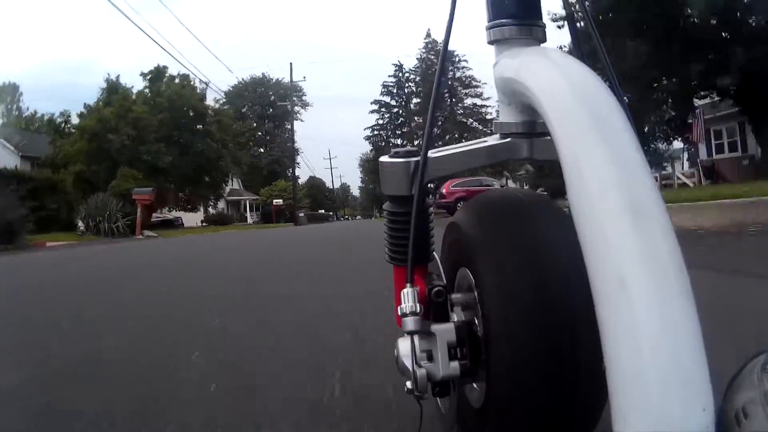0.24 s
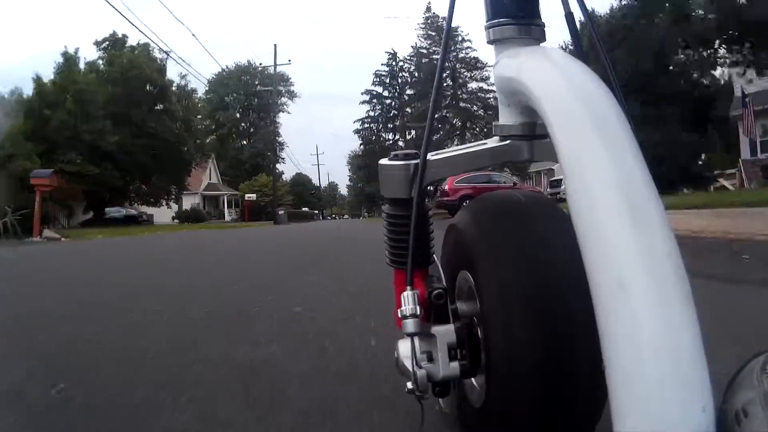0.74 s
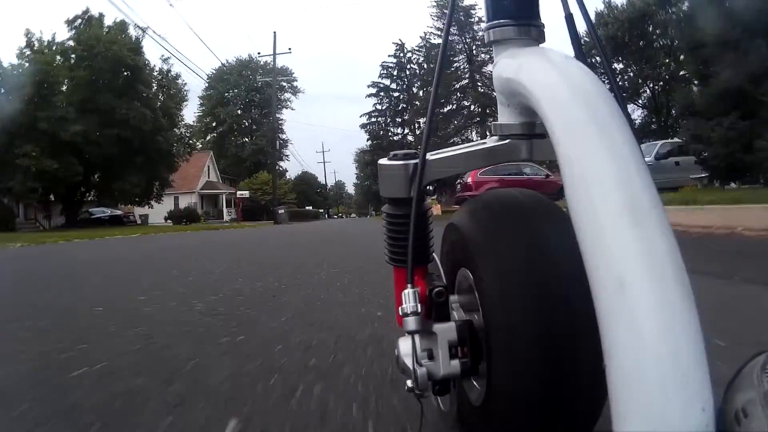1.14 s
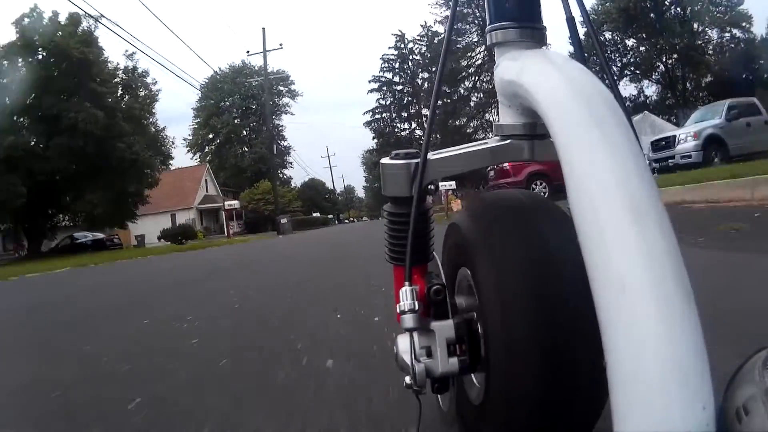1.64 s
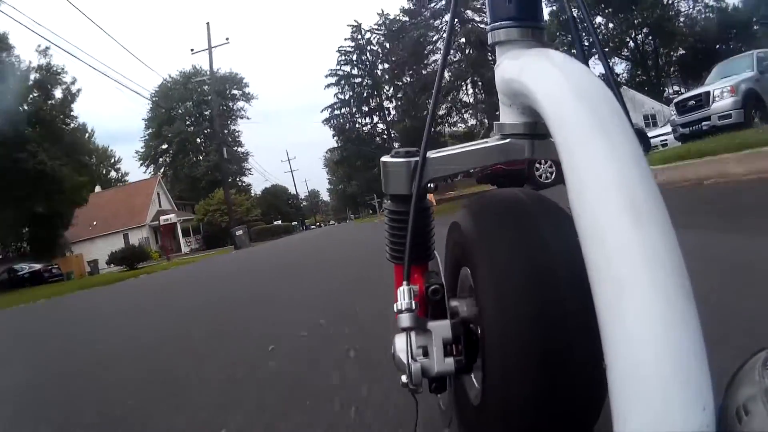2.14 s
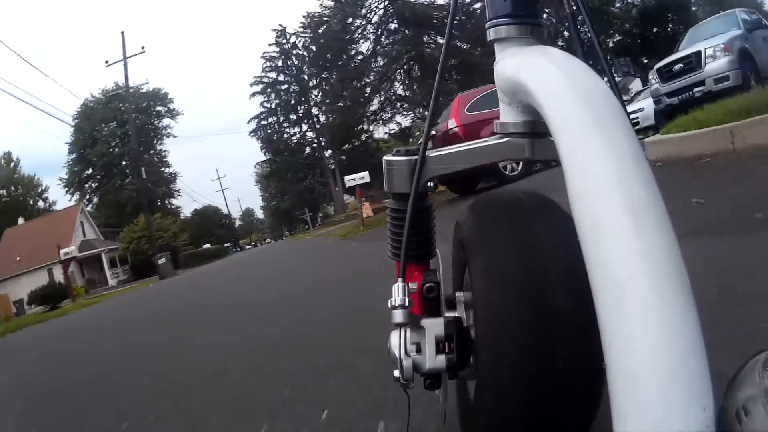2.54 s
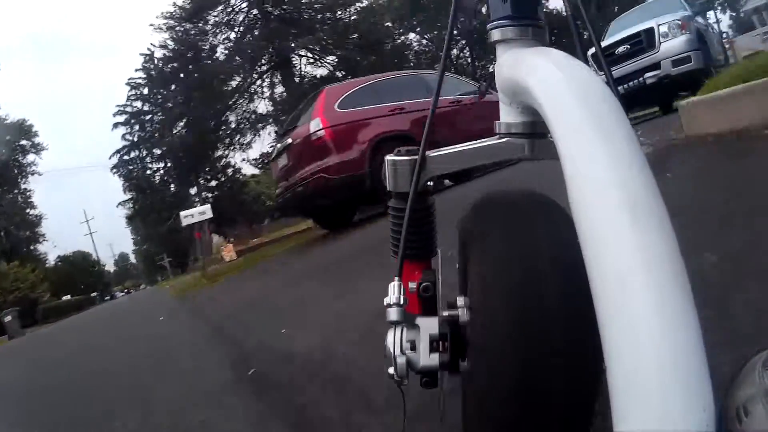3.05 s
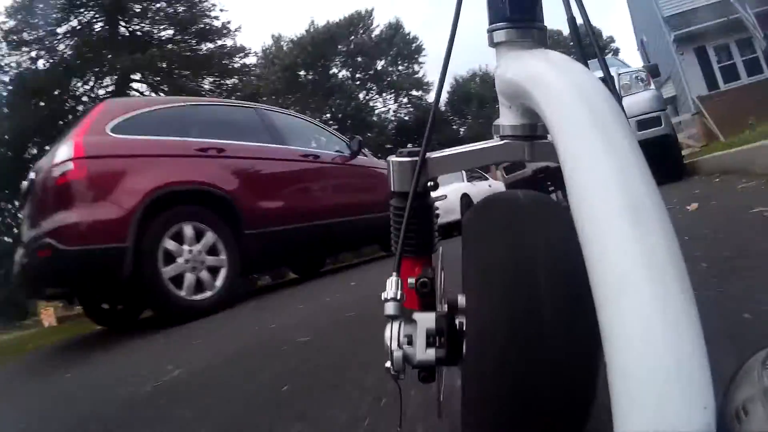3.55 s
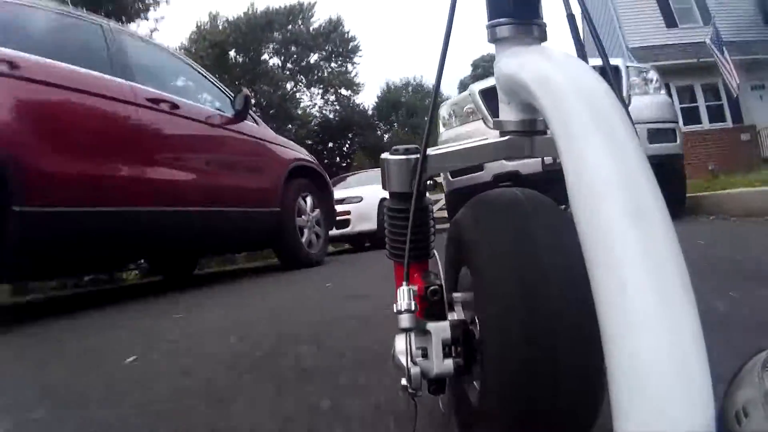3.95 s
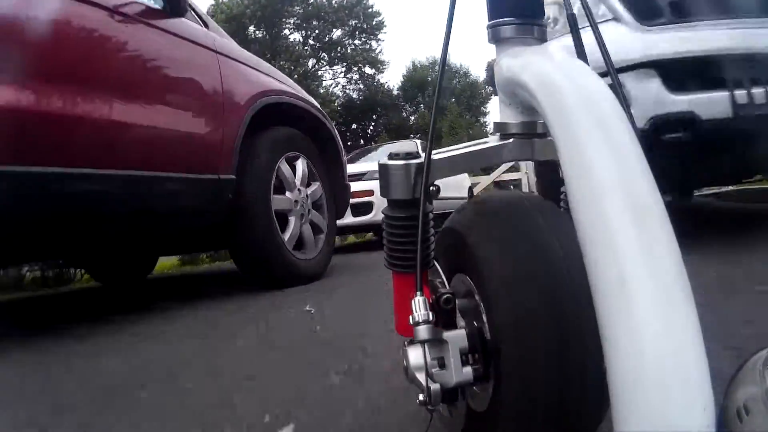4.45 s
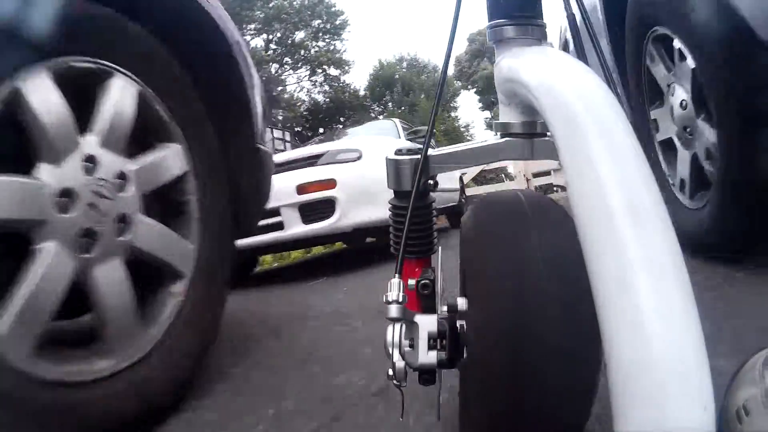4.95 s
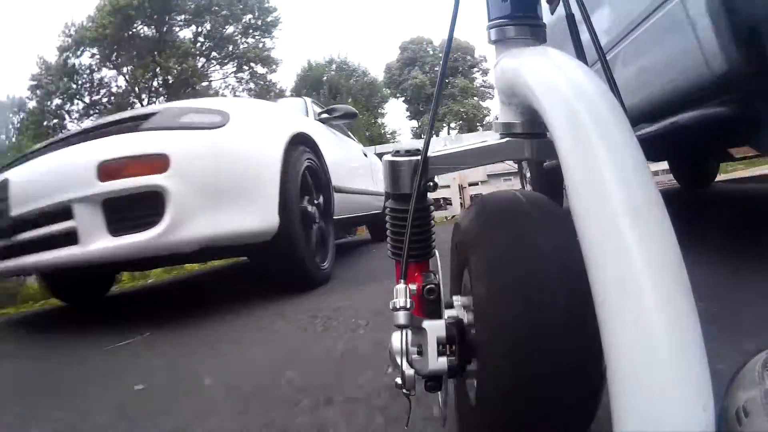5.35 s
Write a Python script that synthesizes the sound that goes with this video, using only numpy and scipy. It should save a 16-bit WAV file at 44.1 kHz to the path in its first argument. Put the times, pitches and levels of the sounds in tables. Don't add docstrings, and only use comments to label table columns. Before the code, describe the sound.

A small two-stroke engine buzzes and rattles loudly through a metal frame, slows to a soft puttering near-idle, with one kerb bump midway.

```python
import sys
import numpy as np
from scipy import signal
from scipy.io import wavfile
from scipy.ndimage import uniform_filter1d

SR = 44100
rng = np.random.default_rng(int(sys.argv[2]) if len(sys.argv) > 2 else 0)


def attenuation_scalar(level_db):
    decades = np.asarray(level_db, float) / 20
    return 10 ** decades


def store_pcm(level_fs):
    pcm = np.round(np.clip(level_fs, -1, 1) * 32767).astype(np.int16)
    wavfile.write(sys.argv[1], SR, np.atleast_2d(pcm).T)


N = 246519

# (time [s], rate [firings/s])
SPEED = [(0.0, 80.7), (0.28, 76.9), (0.7, 69.0), (1.0, 67.2), (1.26, 65.6), (1.65, 60), (1.85, 55.0),
         (2.1, 52), (2.45, 48), (2.7, 45.3), (3.0, 47.2), (3.25, 45.3), (3.55, 41.3), (3.8, 41.0),
         (4.25, 49.0), (4.9, 49.7), (5.32, 47.0), (5.59, 47.2)]
# (time [s], shake of the whole machine [dB], clean firing tone against it [dB])
EFFORT = [(0.0, -11, 8.5), (0.15, -12.5, 11), (0.37, -14, -15.5), (0.65, -15, -1.5), (1.0, -18.5, 0),
          (1.18, -18.5, -11.5), (1.55, -22.5, -1), (1.75, -23, -1.5), (1.95, -23, -3), (2.3, -22, -8),
          (2.6, -25, -9), (3.0, -25.5, -4), (3.5, -25.5, -4.5), (3.9, -26.5, -4), (4.3, -26, -1.5),
          (4.93, -25, -0.5), (5.2, -26.5, -1.5), (5.59, -26.5, -5)]
# (time [s], sharpness [0-1])
PUTTER = [(0, .3), (.9, .5), (1.15, 1), (1.6, 1), (1.9, .3), (3.9, .1), (4.3, .4), (5.59, .3)]
# (frequency [Hz], level [dB])
PANEL = [(500, -10.5), (900, -5), (1100, -2), (1240, 6), (1380, 5), (1550, -6), (1800, -8.5), (2200, -25.5),
         (3000, -40.5), (5000, -62.5), (9000, -83)]
# (frequency [Hz], level [dB])
RATTLE = [(1500, -9), (2400, -5), (3200, -9.5), (3950, -5), (4800, -14), (6000, -25.5), (7500, -29.5),
          (9000, -39), (12000, -51.5), (16000, -73.5)]
# (frequency [Hz], level [dB])
SIZZLE = [(3000, -45), (5500, -17.5), (8000, -10.5), (11000, -10), (14000, -13.5)]


def evened(x):
    return x / np.sqrt(np.mean(x ** 2) + 1e-20)


def levelled(x, seconds):
    power = abs(uniform_filter1d(x ** 2, int(seconds * SR)))
    return x / np.sqrt(power + 1e-12)


def columns(rows):
    s, *values = np.transpose(rows)
    return [np.interp(np.arange(N) / SR, s, v) for v in values]


def colour(x, points):
    hz, db = np.transpose(points)
    grid_hz = abs(np.fft.fftfreq(8192, 1 / SR))
    log_gain = np.log(attenuation_scalar(np.interp(np.log(grid_hz + 1), np.log(hz + 1), db)))
    phase = -signal.hilbert(log_gain).imag
    taps = np.fft.ifft(np.exp(log_gain + 1j * phase)).real[:4096]
    return signal.oaconvolve(x, taps)[:N]


def add(mix, s, sound):
    part = mix[round(s * SR):][:len(sound)]
    part += sound[:len(part)]


def swells(times_s, heights_db, widths_s):
    t = np.arange(0, N + 64, 64) / SR
    bells = heights_db * np.exp(-((t[:, None] - times_s) / widths_s) ** 2)
    return np.interp(np.arange(N) / SR, t, bells.sum(axis=1))


def judder(low_hz, high_hz, depth_db):
    band = signal.butter(1, [low_hz, high_hz], "band", fs=SR)
    slow = signal.lfilter(*band, uniform_filter1d(rng.standard_normal(N), 500))
    return attenuation_scalar(depth_db * np.clip(evened(slow), -2, 1.5))


def road():
    # (frequency [Hz], level [dB])
    fork = [(12, -11), (20, 12), (43, 12.5), (80, 17.5), (120, 17), (200, 8), (400, -35.5), (1500, -110)]
    rumble = evened(colour(rng.standard_normal(N), fork))
    return attenuation_scalar(-37) * judder(low_hz=4.5, high_hz=14.5, depth_db=5.5) * rumble


def hum(start_s, length_s, first_hz, last_hz, db, wobble):
    t = np.arange(0, length_s, 1 / SR)
    swell, waver = (
        evened(uniform_filter1d(uniform_filter1d(rng.standard_normal(len(t)), 500), 500))
        for _ in range(2))
    pitch_hz = np.linspace(first_hz, last_hz, len(t)) + 3 * waver
    tone = np.sin(2 * np.pi * np.cumsum(pitch_hz) / SR)
    fades = signal.windows.tukey(len(t), .3)
    return start_s, attenuation_scalar(db + 1.5) * (1 + wobble * swell) * tone * fades


def hums():
    out = np.zeros(N)
    # (start [s], length [s], first pitch [Hz], last pitch [Hz], level [dB])
    stretches = [
        (0.1, .55, 482, 474, -25),
        (1.63, .22, 490, 462, -25),
        (1.82, .14, 462, 436, -31),
        (2.08, .36, 424, 399, -23.5),
        (2.38, .33, 402, 372, -27),
        (2.73, .47, 390, 397, -28.5),
        (3.26, .15, 404, 382, -24),
        (3.42, .14, 378, 356, -30),
    ]
    for row in stretches:
        add(out, *hum(*row, wobble=.4))
    return out


def bumps():
    out, t = np.zeros(N), np.arange(8000) / SR
    # (time [s], peak level [dB])
    kerb = [
        (3.1356, -9),
        (3.1413, -7),
    ]
    for k, (s, db) in enumerate(kerb):
        u = t / .0007
        push = u ** 2 * (1 - u / 3.5) * np.exp(1.2 - u)
        noise = rng.standard_normal(len(t)) * attenuation_scalar(-60 * t / 0.012)
        clatter = 1.5 * colour(noise, PANEL) + .5 * colour(noise, RATTLE) + .03 * colour(noise, SIZZLE)
        sign = -(-1) ** k
        add(out, s, sign * attenuation_scalar(db) * (push + clatter[:len(t)]))
    fork = attenuation_scalar(-20 - 60 * t / 0.24) * np.sin(2 * np.pi * 28 * t)
    add(out, kerb[0][0], fork)
    return out


def jolts():
    out, t = np.zeros(N), np.arange(1500) / SR
    # (time [s], peak level [dB], ring [Hz])
    hits = [(0.491, -1.5, 484), (0.834, -11.5, 542), (1.239, 5, 512), (2.065, -9.5, 566), (2.283, -8, 390),
            (2.331, -8, 509), (2.361, -19.5, 397), (3.189, -9.5, 620), (3.225, -10, 440), (3.336, -24, 427),
            (3.362, -7.5, 372), (3.432, -5, 745), (3.642, -14.5, 484), (4.117, -13, 450), (4.236, -10, 515)]
    grit = signal.lfilter(*signal.butter(4, 2000, fs=SR), rng.standard_normal((len(hits), len(t))))
    for (s, db, hz), rough in zip(hits, grit):
        ring = np.sin(2 * np.pi * hz * t) + .5 * evened(rough)
        attack = np.minimum(t / 0.004, 1)
        add(out, s, attenuation_scalar(db - 3.5 - 60 * t / 0.026) * ring * attack)
    return out


def knocks():
    out, t = np.zeros(N), np.arange(500) / SR
    # (time [s], peak level [dB], ring [Hz])
    ticks = [(0.41, -17, 3170), (0.6538, -12.5, 3480), (0.6802, -17, 3710), (0.785, -25.5, 3780),
             (0.8346, -14.5, 3580), (0.8732, -11.5, 4060), (1.0383, -14, 3400), (1.1277, -16.5, 3570),
             (1.2374, -54.5, 3620), (1.3983, -30.5, 4000), (1.5522, -20.5, 3270), (1.632, -15.5, 4230),
             (1.73, -19, 3900), (1.783, -19.5, 3550), (2.0596, -39, 3880), (2.2297, -21.5, 3500),
             (2.698, -21.5, 3750), (2.8723, -24, 3840), (2.8947, -29, 3630), (3.042, -25.5, 3600),
             (3.1266, -26.5, 3980), (3.543, -26, 3640), (3.574, -24, 3830), (3.7675, -24.5, 4460),
             (4.2826, -26.5, 3800), (4.346, -20.5, 3730), (4.4086, -26, 3330), (4.8688, -30, 3440),
             (4.9927, -24.5, 3500), (5.2818, -23.5, 3560)]
    grit = rng.standard_normal((len(ticks), len(t))) * attenuation_scalar(-60 * t / 0.014)
    for (s, db, hz), rough in zip(ticks, grit):
        ring = .6 * np.sin(2 * np.pi * hz * t) * attenuation_scalar(-60 * t / .006)
        ring += 2.5 * colour(rough, RATTLE)[:len(t)]
        dull_db = 1 + 6.5 * rough[0] - 22.5
        dull = attenuation_scalar(dull_db) * np.sin(2 * np.pi * 2200 * t) * attenuation_scalar(-60 * t / 0.026)
        add(out, s, attenuation_scalar(db) * (ring + dull) * np.minimum(t / 0.001, 1))
    return out


def crank(spread_db):
    turns = np.cumsum(columns(SPEED)[0]) / SR
    strength = attenuation_scalar(spread_db * np.clip(rng.standard_normal(500), -2, 2))
    return turns, strength[turns.astype(int)]


def surges():
    # (time [s], level over the running shake [dB], half length [s])
    firings = [(0.459, -3.5, 0.049), (0.728, -9, .02), (1.663, 9, 0.0088), (1.918, -3.5, 0.054),
               (2.083, 6, 0.0067), (2.112, -8.5, 0.0054), (2.262, -5, 0.011), (2.302, 2.5, 0.0055),
               (2.336, 4.5, 0.0062), (2.352, -13, 0.0089), (2.364, 2.5, 0.024), (2.727, -6, 0.011),
               (2.832, 2, 0.035), (2.897, 13, 0.004), (3.01, 0.5, 0.0097), (3.212, 3, 0.032),
               (3.32, -8, 0.0059), (3.389, 10.5, 0.018), (3.398, -8, 0.021), (3.437, 5, .012),
               (3.471, -6, .012), (3.618, -3, 0.032), (3.644, 7.5, 0.006), (3.724, -7, 0.019),
               (3.949, -4, .015), (4.071, 6, 0.013), (4.179, -0.5, 0.028), (4.363, 4, 0.014),
               (5.025, -2.5, 0.028), (5.317, -2.5, 0.045)]
    return swells(*np.transpose(firings))


def chatter(shake_db, surge_db):
    # (time [s], level over the running rattle [dB], half length [s])
    runs = [(0.34, 3.5, 0.077), (0.436, -8, 0.016), (0.63, 3.5, 0.1), (0.725, 0, .025), (0.79, 13, 0.012),
            (0.922, 4.5, 0.095), (1.133, 9, 0.017), (1.313, 5.5, 0.019), (1.534, 5.5, 0.017),
            (1.75, 1, .03), (1.93, -3.5, 0.046), (2.22, 3, .04), (2.422, -15, 0.027), (2.537, -11, 0.019),
            (2.686, 3, .03), (2.8, -1.5, .05), (2.905, 13, 0.018), (2.97, -7, 0.051), (3.3, -3.5, 0.035),
            (3.56, 7.5, 0.024), (3.706, -4, 0.046), (3.77, -11, 0.018), (4.03, -8, 0.02), (4.066, 1, .025),
            (4.235, 4.5, 0.03), (4.463, 7.5, 0.09), (4.87, 9, 0.22), (5.195, -9, 0.023), (5.25, 10.5, .04),
            (5.442, 8, 0.028)]
    level_db = -8.5 + 1.823 * shake_db + 0.79 * surge_db + swells(*np.transpose(runs))
    return attenuation_scalar(level_db) * judder(low_hz=5.8, high_hz=25, depth_db=1)


def rattle(turns, strength, slop_turns, stray_per_s, spread_db, count):
    speed, sharp = columns(SPEED)[0], columns(PUTTER)[0]
    fast = np.clip((speed - 55) / 15, 0, 1)
    wander = slop_turns * evened(uniform_filter1d(rng.standard_normal(N), 150))
    beat = np.diff(np.maximum.accumulate(np.floor(count * turns + wander)), prepend=0)
    hits = beat + (rng.random(N) < stray_per_s * (1 + 8 * sharp) / SR)
    after = 1 - .93 * sharp + np.exp(-(turns % 1) / .15)
    size_db = spread_db * (1 - .4 * fast) * np.clip(rng.standard_normal(N), -2, 1.3)
    size = attenuation_scalar(size_db) * strength * after
    puffs = signal.lfilter([1], [1, -np.exp(-1 / (.0007 * SR))], hits * size)
    grit = (puffs + .03) * rng.standard_normal(N)
    sharpest = grit * np.minimum(abs(puffs), 2) ** 1.5
    blur = np.clip((speed - 72) / 8, 0, 1)
    sharpest = sharpest + 0.4 * blur * rng.standard_normal(N)
    treble = attenuation_scalar(-25) * fast ** 2 * colour(sharpest, SIZZLE)
    return levelled(colour(grit, RATTLE) + treble, 0.077)


def shaken(turns, strength, points, rest, fade_turns, delay_turns):
    between = rest * (1 - .75 * columns(PUTTER)[0])
    kick = between + strength * np.exp(-((turns - delay_turns) % 1) / fade_turns)
    return levelled(colour(kick * rng.standard_normal(N), points), 0.089)


def cover(turns, strength):
    # (frequency [Hz], level [dB])
    sheet = [(1200, -28), (1600, 6.5), (1950, 4.5), (2300, -7.5), (2800, -13), (4000, -21.5), (8000, -60.5)]
    return shaken(turns, strength, sheet, rest=0.57, fade_turns=0.4, delay_turns=0.12)


def panels(turns, strength):
    return shaken(turns, strength, PANEL, rest=1.7, fade_turns=0.12, delay_turns=0.073)


def frame(turns, strength):
    # (frequency [Hz], level [dB])
    tubes = [(12, -36.5), (20, -16), (43, -19), (82, -7.5), (145, 2.5), (202, -1.5), (256, -6.5), (484, -2),
             (885, -14), (1100, -21), (1430, -58.5), (2420, -120)]
    shake = shaken(turns, strength, tubes, rest=1.0, fade_turns=0.29, delay_turns=0.019)
    return signal.lfilter(*signal.butter(2, 95, "high", fs=SR), shake)


def exhaust(turns, strength, thump_db, jitter_turns, lag_turns):
    # (frequency [Hz], level [dB])
    pipe = [(60, -56.5), (150, -15.5), (230, 1), (300, 4), (400, 1.5), (480, 4), (600, -10.5),
            (1000, -22.5), (2500, -54), (6000, -86)]
    # (frequency [Hz], level [dB])
    mount = [(80, 1), (100, 6), (135, -0.5), (160, -1), (200, -1), (250, -8), (320, -8.5), (500, -12)]
    orders_db = [-2.5, -2, 1, -4.5, -6.5]
    # (frequency [Hz], level [dB])
    imbalance = [(40, -47), (50, -47.5), (56, -30), (62, -26), (70, -19.5), (76, -20.5), (81, -25)]
    late = turns + jitter_turns * evened(uniform_filter1d(rng.standard_normal(N), 600))
    fired = np.diff(np.maximum.accumulate(np.floor(late)), prepend=0)
    pulses = levelled(colour(-fired * strength, pipe), 0.024)

    mount_hz, mount_db = np.transpose(mount)
    speed, tone_db = columns(SPEED)[0], sum(columns(EFFORT))
    angle = 2 * np.pi * (turns - lag_turns)
    orders = attenuation_scalar(np.interp(speed, *np.transpose(imbalance))) * np.sin(angle)
    for k, db in enumerate(orders_db, 2):
        passed_db = np.interp(np.log(k * speed), np.log(mount_hz), mount_db)
        uneven = judder(low_hz=1.5, high_hz=6, depth_db=1.5)
        orders += attenuation_scalar(tone_db + db + passed_db) * uneven * np.sin(k * angle)
    return attenuation_scalar(thump_db) * pulses + orders


def scene():
    turns, strength = crank(spread_db=2.2)
    shake_db, surge_db = columns(EFFORT)[0], surges()
    frame_db = shake_db + surge_db
    panel_db = 1.222 * shake_db + 0.87 * surge_db
    thump_db = frame_db - 10.5 + 5 * columns(PUTTER)[0]
    shudder = judder(low_hz=17.8, high_hz=24.8, depth_db=1.01)

    mix = road() + hums() + bumps() + jolts() + knocks()
    ticks = rattle(turns, strength, slop_turns=0.06, stray_per_s=55, spread_db=8.5, count=3)
    mix += chatter(shake_db, surge_db) * shudder * ticks
    mix += attenuation_scalar(panel_db - 13.5) * shudder ** 2 * cover(turns, strength)
    mix += attenuation_scalar(panel_db - 0.74) * shudder * panels(turns, strength)
    mix += attenuation_scalar(frame_db + 0.33) * shudder * frame(turns, strength)
    mix += exhaust(turns, strength, thump_db, jitter_turns=0.012, lag_turns=0.052)
    return mix[None]


def roll_off(x):
    return signal.sosfilt(signal.butter(12, 14600, fs=SR, output="sos"), x)


def record(dry):
    overload = .505
    held = dry / (1 + abs(dry / overload) ** 12.4) ** (1 / 8.9)
    hiss = attenuation_scalar(-75) * rng.standard_normal(dry.shape)
    return roll_off(held + hiss)


dry = scene()
out = record(dry)
store_pcm(out)
```